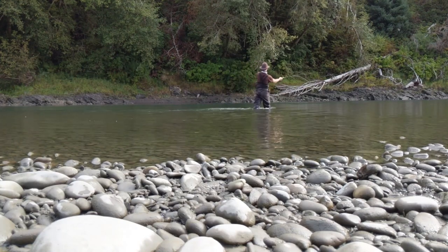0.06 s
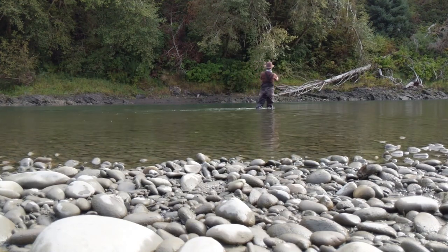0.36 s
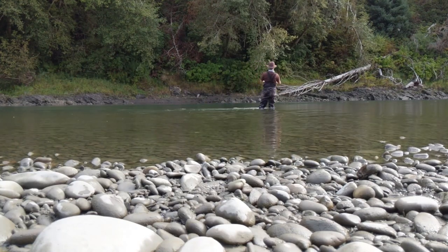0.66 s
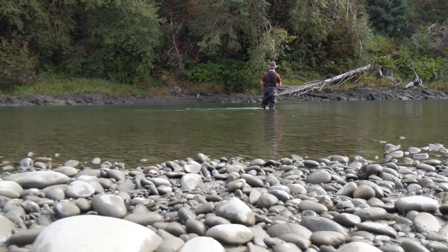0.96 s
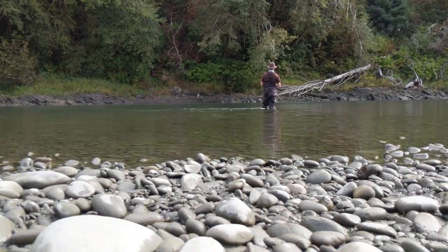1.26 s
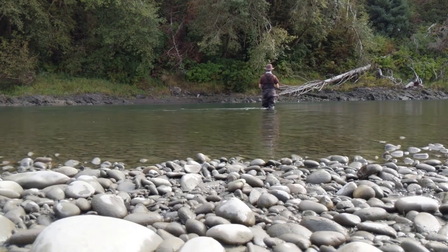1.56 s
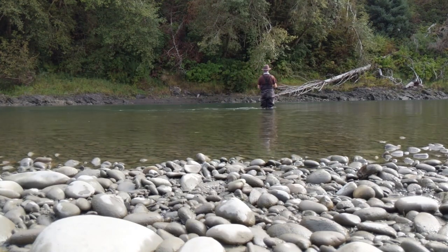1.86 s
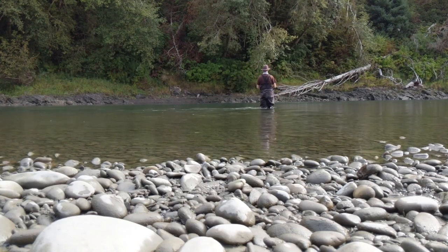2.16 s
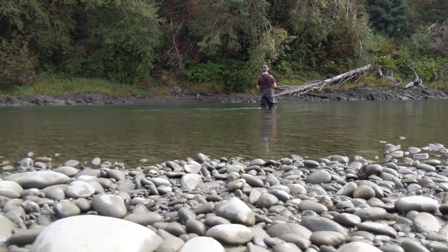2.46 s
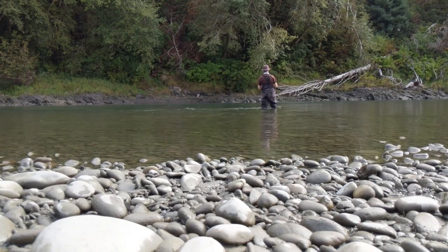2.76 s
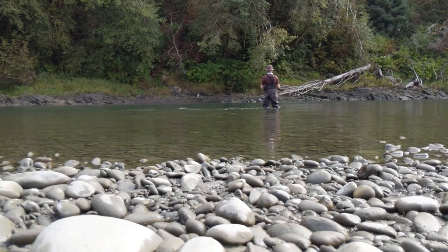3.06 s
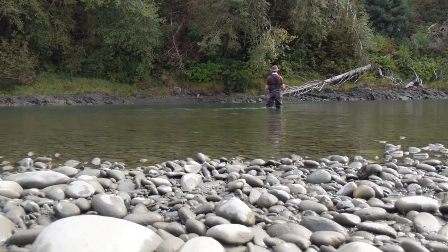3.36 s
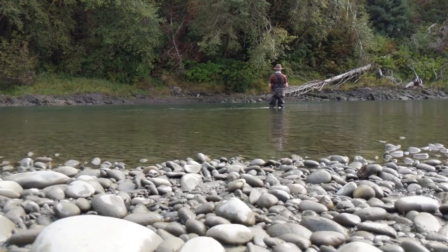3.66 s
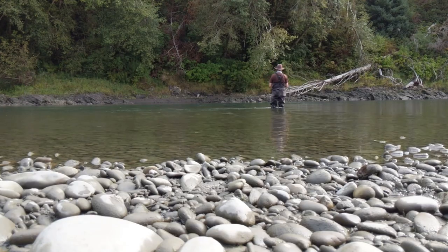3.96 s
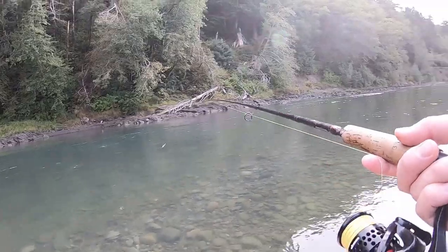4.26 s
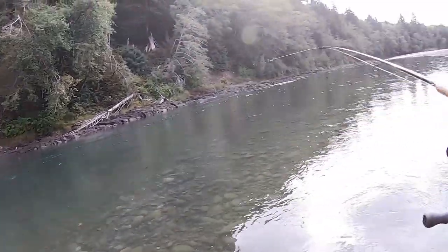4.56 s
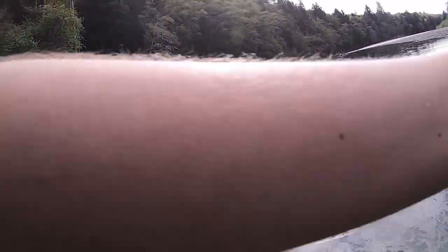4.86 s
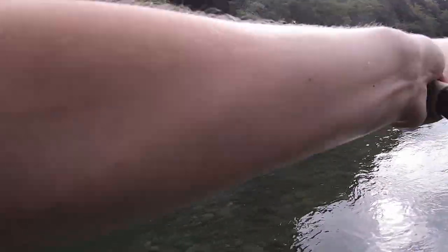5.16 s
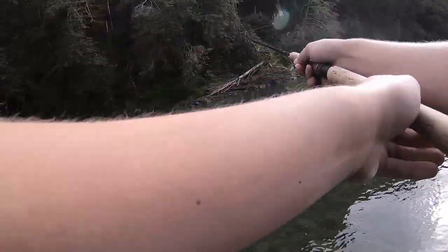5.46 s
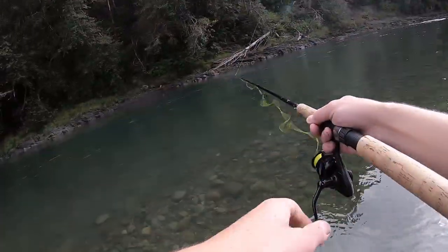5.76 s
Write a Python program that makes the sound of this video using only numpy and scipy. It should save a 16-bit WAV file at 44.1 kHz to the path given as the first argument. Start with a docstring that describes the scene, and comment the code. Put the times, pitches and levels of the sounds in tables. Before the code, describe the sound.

A fishing rod whips through the air with a low thump of wind on the close microphone, and line hisses off the spool. Legs wade through a shallow river, sloshing, gulping and dripping over the soft current. Midway the reel snaps shut with a sharp click. More strides follow, then a second puff of air and another whipping cast with line ticking out. A small bird chirps faintly far off.

```python
"""A shallow river, where an angler wades: water sloshes, gulps and spatters around the legs over the
murmur of the current. Ringing air bubbles and noise make these water sounds.
Two casts: the arm pushes air at the microphone, the rod swishes and whips as it sheds swirls of air,
and the line hisses off the spool ever slower. Between them the reel's bail (its wire arm) snaps shut,
the gear bumps softly and a small bird calls far off."""
import sys
import numpy as np
from scipy import signal
from scipy.fft import rfft, irfft, next_fast_len
from scipy.io import wavfile
from scipy.ndimage import map_coordinates

SR = 44100
rng = np.random.default_rng(int(sys.argv[2]) if len(sys.argv) > 2 else 0)


def transcribe(u):
    """Save the signal u as a 16-bit wav file named by the first command-line argument.

    u: samples, shape (n,) or (channels, n), limited to [-1, 1]; the rate is SR.
    q: integer samples, one column per channel.
    """
    v = np.clip(np.atleast_2d(u).T, -1, 1)
    q = np.round(v * 32767).astype(np.int16)
    wavfile.write(sys.argv[1], SR, q)


N = 260631
T = np.arange(N) / SR  # seconds, for the whole scene
SHORT = T[:SR // 4]  # seconds, for one short sound
DRIP_DB = -73  # spray of the current against standing legs

# tone of churned water: pitch_hz, level_db
SLOSH_TONE = [(150, -7), (270, -3.5), (400, 2), (700, 7), (1300, 8.5), (2000, -3), (3200, -62), (8000, -48)]
# tone of fine spray: pitch_hz, level_db
SPRAY_TONE = [(1000, 7.5), (2200, 8), (4200, 0), (6000, -17), (10000, -17), (16000, -51)]


def amp(db):
    """Turn decibels into a gain."""
    return 10 ** (np.asarray(db) / 20)


def unit(x):
    """Scale a sound to an average (rms) level of 1."""
    return x / np.sqrt(np.mean(x ** 2) + 1e-20)


def along(points, hz):
    """Read between (pitch_hz, value) points on a log pitch scale."""
    pitches, values = np.transpose(points)
    return np.interp(np.log(hz + 1), np.log(pitches + 1), values)


def wobble(per_s):
    """A smooth curve through per_s random values a second."""
    return map_coordinates(rng.standard_normal(int(N * per_s / SR) + 4), [T * per_s])


def filtered(x, response):
    """Scale each frequency of x by response(hz)."""
    size = next_fast_len(len(x) + SR // 2)
    return irfft(rfft(x, size) * response(np.fft.rfftfreq(size, 1 / SR)), size)[:len(x)]


def coloured(x, tone):
    """Shape x with a tone of (pitch_hz, level_db) points, then scale it to level 1."""
    return unit(filtered(x, lambda hz: amp(along(tone, hz))))


def noise(tone):
    """Noise with the given tone, at level 1."""
    return coloured(rng.standard_normal(N), tone)


def bell(peak_s, width_s):
    """A smooth hump that falls to 0.6 at width_s either side of its peak."""
    return np.exp(-.5 * ((T - peak_s) / width_s) ** 2)


def swell(peak_s, rise_s, fall_s):
    """A level that builds to a sharp peak and dies away."""
    return np.exp(-np.maximum(peak_s - T, 0) / rise_s - np.maximum(T - peak_s, 0) / fall_s)


def taps(per_s, scatter_db, fade_s):
    """The level of many random little hits, each fading fast."""
    hits = (rng.random(N) < per_s / SR) * amp(scatter_db * rng.standard_normal(N))
    return unit(signal.lfilter([1], [1, -np.exp(-1 / (fade_s * SR))], hits))


def add(track, start_s, sound):
    """Mix a sound into a track."""
    part = track[max(round(start_s * SR), 0):][:len(sound)]
    part += sound[:len(part)]


def airy_tone(pitch_hz, spread):
    """Noise around a pitch, as from air swirling off a thin moving thing; more spread is breathier."""
    cycles = np.cumsum(pitch_hz) / SR
    knots = rng.standard_normal((2, N))
    a, b = (map_coordinates(k, [cycles * spread], order=1, mode="wrap") for k in knots)
    return a * np.sin(2 * np.pi * cycles) + b * np.cos(2 * np.pi * cycles)


def bubbles(activity, centre_hz, octaves, cycles, rise, scatter_db, count):
    """Bubbles ring as fading, rising notes; high activity packs them closer at the same overall level."""
    when, pitch, life, size = rng.random((count, 4)).T
    start = np.searchsorted(np.cumsum(activity) / np.sum(activity), when)
    hz = centre_hz * 2 ** (octaves * (2 * pitch - 1))
    t = T[:round(1.5 * cycles / centre_hz * 2 ** octaves * SR)]
    age = t * (hz / (cycles * (.5 + life)))[:, None]
    ring = np.sin(2 * np.pi * hz[:, None] * t * (1 + rise * np.minimum(age, 2) / 2))
    ring *= np.exp(-np.pi * age) * (1 - np.exp(-20 * age))
    ring *= amp(-scatter_db * np.log(1 - .97 * size))[:, None]  # a few are much louder
    samples = start[:, None] + np.arange(len(t))
    return np.bincount(samples.ravel(), ring.ravel(), N)[:N] / np.sqrt(activity)


def river():
    """The current murmurs with small bubbles."""
    # tone of the current: pitch_hz, level_db
    current_tone = [(60, 2.5), (150, -1.5), (280, -6), (450, 0), (800, 0), (1300, -13.5), (2200, -11.5),
                    (3200, -17), (5000, -21.5), (8000, -26), (12000, -30.5), (16000, -31.5)]
    babble = bubbles(np.ones(N), centre_hz=817, octaves=1.24, cycles=7, rise=.1, scatter_db=2, count=900)
    return amp(-60 + .77 * wobble(9.6)) * noise(current_tone) + amp(-67) * unit(babble)


def breeze():
    """Light air rumbles on the microphone."""
    # gusts and the wake of the swinging arm: peak_s, level_db, rise_s, fall_s
    gusts = [(.12, -25.5, .3, .16), (1.78, -46.5, 0.16, 0.84), (5.18, -26.5, 0.062, 0.12)]
    # tone of the rumble: pitch_hz, level_db
    rumble_tone = [(8, 3), (15, 10), (30, -13.5), (60, -22), (120, -31.5), (250, -35), (600, -100)]
    air = amp(-54) + sum(amp(db) * swell(s, rise, fall) for s, db, rise, fall in gusts)
    return air * amp(1.75 * wobble(4.056)) * noise(rumble_tone)


def stirring():
    """How strong the slosh and the spray are as each stride builds up and settles."""
    # a leg shoving through the water: peak_s, rise_s, fall_s, slosh_db, spray_db
    strides = [(.08, .2, .36, -44, -54), (1.29, .2, .27, -52.5, -65), (1.92, .25, .22, -56, -68.5),
               (2.84, .04, .04, -55, -69), (3.22, .17, .25, -49, -63.5), (3.58, .13, .3, -46.5, -60.5),
               (4.115, .04, .06, -51.5, -62.5)]
    slosh_power, spray_power = 1e-12, amp(DRIP_DB) ** 2
    for peak_s, rise_s, fall_s, slosh_db, spray_db in strides:
        shove = swell(peak_s, rise_s, fall_s)
        slosh_power += (amp(slosh_db) * shove) ** 2
        spray_power += (amp(spray_db) * shove) ** 2
    return np.sqrt(slosh_power), np.sqrt(spray_power)


def wading():
    """The legs churn up clouds of bubbles and rounder gurgles, and throw fine spray."""
    slosh, spray = stirring()
    cloud = bubbles(slosh, centre_hz=780, octaves=1.5, cycles=17, rise=.35, scatter_db=3, count=1300)
    fizz = bubbles(spray, centre_hz=4000, octaves=1.2, cycles=13, rise=.1, scatter_db=3, count=2000)
    gurgles = bubbles(slosh, centre_hz=760, octaves=1.1, cycles=36, rise=.35, scatter_db=1, count=110)
    body = amp(-1.5) * coloured(cloud, SLOSH_TONE) + amp(-11) * noise(SLOSH_TONE)
    body += amp(-7.5) * unit(gurgles)
    lapping = amp(-64.5) * noise(SLOSH_TONE)  # the current against standing legs
    churn = np.minimum(slosh / amp(-58.5), 1)  # only hard-churned water fizzes
    mist = churn * coloured(fizz, SPRAY_TONE) + amp(-1) * noise(SPRAY_TONE)
    return lapping + slosh * body + spray * mist


def splashes():
    """Spray comes down in clumps, as a patter of ticks and, where a leg throws it, tiny bubbles."""
    # tone of falling spray: pitch_hz, level_db
    patter_tone = [(1500, -10), (4000, 4.5), (7000, -3.5), (11000, -11), (16000, -21)]
    _, spray = stirring()
    clumps = amp(2 * wobble(14))
    thrown = np.maximum(spray - amp(DRIP_DB), 1e-7) * clumps
    patter = coloured(taps(350, scatter_db=3, fade_s=.0014) * rng.standard_normal(N), patter_tone)
    plinks = bubbles(thrown, centre_hz=2900, octaves=.9, cycles=26, rise=.2, scatter_db=2.5, count=200)
    return amp(-4.5) * spray * clumps * patter + amp(-3.5) * thrown * unit(plinks)


def gulps():
    """A big air pocket snaps shut, then rings and glides as its shape and depth change; water washes in."""
    # the largest air pockets: start_s, level_db, pitch_hz, glide_ratio (above 1 rises)
    pockets = [(.042, -33.5, 251, 1.33), (.317, -35, 738, 1.34), (.669, -41, 800, 0.86),
               (1.152, -40, 332, 1), (1.168, -43.5, 770, 1.3), (1.233, -37.5, 414, 0.41),
               (1.254, -44, 1314, 0.95), (1.334, -35.5, 210.6, 1.05), (1.339, -36.5, 967, 1.2),
               (1.37, -45.5, 685, 1.23), (1.56, -49, 750, 1.15), (1.597, -42, 275, 1.3),
               (1.693, -45, 493, 1.4), (1.921, -43, 952, 1.15), (2.481, -43.5, 745, 1.06),
               (2.553, -41, 710, 1.1), (2.811, -45, 670, 0.82), (3.036, -39, 502, 1.28),
               (3.076, -43, 885, 1.12), (3.118, -32.5, 383, 1.4), (3.199, -42, 392, 1.18),
               (3.222, -36, 375, .87), (3.268, -40.5, 645, 1.08), (3.313, -41.5, 598, 1.33),
               (3.378, -36.5, 1230, 0.91), (3.385, -34.5, 797, 1.3), (3.49, -35, 620, 1.47),
               (3.505, -34, 448, 1.03), (3.569, -35.5, 1214, 1.12), (3.684, -45, 595, 1.04),
               (3.615, -41.5, 595, 1.2), (3.778, -42, 600, 1.1), (3.787, -42, 361, 1.1),
               (4.071, -36, 472, 1.15), (4.073, -45, 1336, 1.08), (4.092, -39.5, 608, 1.13),
               (4.387, -45.5, 370, 0.95)]
    rings, wash, snaps = np.zeros((3, N))
    for start_s, db, pitch_hz, glide in pockets:
        ring_s = .03 * (500 / pitch_hz) ** .57  # higher pockets ring shorter
        age = SHORT / ring_s
        hz = pitch_hz * (1 + (glide - 1) * np.minimum(age, 1.3))
        level = (1 - np.exp(-age / .05)) * np.exp(-1.8 * age ** 2)
        add(rings, start_s, amp(db - 3) * level * np.sin(2 * np.pi * np.cumsum(hz) / SR))
        add(wash, start_s, amp(db - 17) * level)
        add(snaps, start_s, amp(db - 14.5) * np.exp(-SHORT / .0029))
    rings *= amp(2 * wobble(90))
    snap_tone = [(300, -2), (1400, -1), (3000, -8), (9000, -31)]
    return rings + wash * noise(SLOSH_TONE) + snaps * noise(snap_tone)


def sleeve():
    """A sleeve brushes past as the arm swings."""
    # each brush: peak_s, level_db, width_s
    rustles = [(0.057, -49.5, 0.015), (5.04, -62.5, 0.033), (5.117, -53.5, 0.014)]
    # tone of the cloth: pitch_hz, level_db
    cloth_tone = [(600, 4), (2200, -2.5), (5000, -5), (9000, -7.5), (16000, -20)]
    return sum(amp(db) * bell(s, width) for s, db, width in rustles) * noise(cloth_tone)


def pushes():
    """The air pushes, then sucks back, with a flutter of small swirls."""
    # air pushed by the arm, and soft bumps of the gear: middle_s, level_db, width_s, flutter_db
    puffs = [(0.08, -12, 0.011, -29), (0.711, -43, 0.0011, -53), (1.784, -37.5, 0.056, -52),
             (4.27, -39.5, 0.0027, -54), (5.132, -14.5, 0.012, -38.5), (5.625, -39, 0.0014, -48)]
    # tone of the swirls: pitch_hz, level_db
    flutter_tone = [(20, -25), (50, 7), (100, -1.5), (200, -15), (320, -18), (600, -31), (2000, -39),
                    (9000, -60)]
    pressure, flutter = np.zeros((2, N))
    for s, db, width, flutter_db in puffs:
        pressure += amp(db) * (s - T) / width * bell(s, width) * np.sqrt(np.e)
        flutter += amp(flutter_db) * bell(s, 2.2 * width)
    return pressure + flutter * noise(flutter_tone)


def rod(whip_s, whip_tone, whip_db, swish_db, rush_db, whistle_hz, whistle_db):
    """The rod speeds up: air rushes, the tip's swish rises in pitch and ends in a whistling whip."""
    # tone of the rushing air: pitch_hz, level_db
    rush_tone = [(120, -64), (230, 7.5), (500, -7.5), (1400, -9.5), (2500, -8.5), (5000, -12),
                 (7000, -17.5), (10000, -18.5), (16000, -32)]
    before, after = np.maximum(whip_s - T, 0), np.maximum(T - whip_s, 0)
    rush = amp(rush_db) * np.exp(-before / .081 - after / .026) * noise(rush_tone)
    # the thin tip sings high, the thicker shaft lower
    tip_hz = (280 + 3300 * np.exp(-before / .044)) * amp(.9 * wobble(110))
    sweep = airy_tone(tip_hz, spread=.45) + amp(-4.5) * airy_tone(.59 * tip_hz, spread=.56)
    swing = np.exp(-np.maximum(before - .03, 0) / .044 - np.maximum(T - whip_s + .018, 0) / .021)
    swish = amp(swish_db - 5) * swing * sweep
    burst = bell(whip_s, .0052) + .14 * bell(whip_s + .004, .0043)
    whip = amp(whip_db - 2) * burst * housing(noise(whip_tone), ring_db=-2)
    whistle = amp(whistle_db) * bell(whip_s + .004, .0037) * airy_tone(np.full(N, whistle_hz), spread=.07)
    # the slowing rod leaves a low whoosh behind
    wake_tone = [(200, -25), (380, 1), (950, -.5), (1600, -2), (3000, -24.5)]
    wake = amp(whip_db - 15.5) * bell(whip_s + .0092, .015) * noise(wake_tone)
    return rush + swish + whip + whistle + wake


def housing(x, ring_db):
    """Sound close to the camera rings its case; the result is scaled to level 1."""
    # notes the case rings at: pitch_hz, width_hz, level_db
    notes = [(1324, 43, 7.5), (1762, 98, 9.5), (2260, 87, -8), (3020, 7.7, -6), (3330, 30, -16),
             (3650, 76, -7), (4290, 190, -2), (4540, 60, -24), (8250, 230, -4), (10100, 340, 1.5)]

    def ringing(hz):
        return sum(amp(db) * 1j * hz * width / (pitch ** 2 - hz ** 2 + 1j * hz * width)
                   for pitch, width, db in notes)
    return unit(filtered(x, lambda hz: 1 + amp(ring_db) * ringing(hz)))


def line(whip_s, hiss_db, rattle_db, hum_db):
    """The line flies off the spool, slowed by the air."""
    # tone of the line's hiss: pitch_hz, level_db
    hiss_tone = [(3000, -25), (6000, -7), (8300, -2), (11000, -6), (16000, -7)]
    # tone of the line's rattle: pitch_hz, level_db
    rattle_tone = [(200, 10.5), (700, 11.5), (1500, 5), (2000, 1.5), (3000, 1.5), (4900, -6), (6300, -24),
                   (9000, -8.5), (16000, -11)]
    after = np.maximum(T - whip_s, 0)
    flying = .5 + .5 * np.tanh((T - whip_s) / .056)
    speed = 1 / (1 + after / .26)
    # the fluttering hiss falls in pitch with the speed
    hiss_hz = np.minimum(25500 * speed, 15000) * amp(.35 * wobble(120))
    hiss = airy_tone(hiss_hz, spread=.56) + amp(-3.5) * noise(hiss_tone)
    hiss *= amp(hiss_db + 1.3 * wobble(71)) * flying * np.exp(-after / .44)
    # coils slap the guides, the rings along the rod
    slaps = taps(300 * speed, scatter_db=4, fade_s=.001)
    rattle = housing(coloured((3.1 + slaps) * rng.standard_normal(N), rattle_tone), ring_db=1.5)
    rattle *= amp(rattle_db - 3.5) * flying * np.exp(-after / .2)
    # the whirling loop of line hums, sinking as it slows
    hum = airy_tone(160 + 135 * np.exp(-after / .25) + 130 * np.exp(-after / .02), spread=.15)
    hum *= amp(hum_db) * (1 - np.exp(-after / .01)) * np.exp(-after / .16)
    return hiss + rattle + hum


def guides(whip_times):
    """Loose line ticks on the rod's guides, and the slow last coils whisper through them."""
    # the hardest slaps of the line: start_s, level_db
    slaps = [(0.553, -38.5), (.789, -42), (5.341, -39), (5.431, -41)]
    running = sum(swell(s, rise_s=.022, fall_s=.47) for s in whip_times)
    ticks = amp(-55) * running * taps(30, scatter_db=2, fade_s=.002)
    for start_s, db in slaps:
        add(ticks, start_s, amp(db - 1) * np.exp(-SHORT / .0042) * (1 - np.exp(-SHORT / .00045)))
    whisper = amp(-62) * sum(swell(s, rise_s=.023, fall_s=.77) for s in whip_times)
    tick_tone = [(600, -23), (1800, 10), (3000, 3), (5000, -5.5), (8000, -18.5)]
    whisper_tone = [(1000, -5), (2500, 6), (4500, -2), (7500, -12), (12000, -30)]
    return ticks * noise(tick_tone) + whisper * noise(whisper_tone)


def spool(whip_times):
    """The line scrapes the spool's lip, high and then lower."""
    # scrapes after each whip: delay_s, level_db, width_s, pitch_hz
    scrapes = [(0.138, -62, 0.076, 4970), (.46, -67, 0.15, 2896)]
    out = np.zeros(N)
    for delay_s, db, width_s, hz in scrapes:
        touching = sum(bell(s + delay_s, width_s) for s in whip_times)
        out += amp(db) * touching * airy_tone(np.full(N, hz), spread=.33)
    return out * amp(4.9 * wobble(110))


def casting():
    """Each swing of the rod sends the line off the spool and through the guides."""
    # the casts: whip_s, whip_db, swish_db, rush_db, whistle_hz, whistle_db, hiss_db, rattle_db, hum_db
    casts = [(.221, -28, -36.5, -42.5, 1811, -34.5, -55, -42.5, -46.5),
             (5.278, -23.5, -35.5, -46, 3020, -38, -53, -43.5, -52.5)]
    # tone of the whip, one list for each cast: pitch_hz, level_db
    whip_tones = [
        [(180, -37), (300, -18), (1110, -3.5), (1800, -4), (2420, -11.5), (4260, -8.5), (6890, -29),
         (8140, -13), (10100, -18.5), (11300, -26), (15800, -29)],
        [(180, -38), (300, -17), (643, -24), (1010, -5), (1710, -4.5), (2120, -12), (3010, 2), (3670, -5),
         (4330, -0.5), (5030, -10), (6670, -19.5), (10300, -27.5), (15800, -29)],
    ]
    whip_times = [s for s, *_ in casts]
    out = guides(whip_times) + spool(whip_times)
    for (whip_s, *rod_settings, hiss_db, rattle_db, hum_db), tone in zip(casts, whip_tones):
        out += rod(whip_s, tone, *rod_settings) + line(whip_s, hiss_db, rattle_db, hum_db)
    return out


def bird():
    """A far bird's thin, high notes sag in pitch and linger among the trees."""
    # the notes: start_s, level_db, length_s, pitch_hz
    chirps = [(0.949, -64, 0.084, 7500), (1.134, -71, 0.1, 7470), (1.521, -73, .05, 7800),
              (2.726, -71, 0.049, 7520), (2.922, -67, 0.041, 7200), (4.203, -61, 0.042, 7460),
              (4.293, -64.5, 0.045, 7200)]
    out = np.zeros(N)
    for start_s, db, length_s, hz in chirps:
        pitch = hz * (1 - .21 * np.clip(T - start_s, 0, .5))
        note = bell(start_s + length_s / 2, .62 * length_s) * airy_tone(pitch, spread=.12)
        linger = bell(start_s + length_s, 2 * length_s) * airy_tone(.88 * pitch, spread=.35)
        out += amp(db - 4) * note + amp(db - 11) * linger
    return out * amp(3.4 * wobble(45))


def drops():
    """A drop ticks on the surface and leaves a tiny ringing bubble."""
    # the heaviest drops falling back: start_s, level_db, pitch_hz
    heavy_drops = [(1.5617, -42, 1980), (2.1214, -44, 2320), (2.45, -46.5, 2370), (2.861, -48, 3750),
                   (3.0376, -38.5, 1830), (3.1214, -43, 1730), (3.3153, -42, 4370), (3.547, -38, 1710),
                   (3.6153, -40.5, 2720), (3.8926, -40.5, 1910), (4.144, -40.5, 1750)]
    plinks, ticks = np.zeros((2, N))
    level = np.exp(-SHORT / .0035) * (1 - np.exp(-SHORT / .0004))
    for start_s, db, hz in heavy_drops:
        add(plinks, start_s, amp(db - 1) * level * np.sin(2 * np.pi * hz * SHORT * (1 + 3 * SHORT)))
        add(ticks, start_s, amp(db - 11) * np.exp(-SHORT / .005))
    return plinks + ticks * noise(SPRAY_TONE)


def reel():
    """The bail snaps shut and bounces to rest; each hit and each light click rings the reel and rod."""
    # light clicks in the reel: start_s, level_db
    clicks = [(2.233, -44.5), (2.2835, -44.5), (2.3124, -49), (4.2415, -46.5), (4.255, -48.5), (4.55, -51)]
    # notes the reel rings at on its rod: pitch_hz, level_db, ring_s (time to fade by 60 dB)
    notes = [(473, -17, 0.17), (598, 1, 0.036), (690, -5, 0.14), (782, -5, 0.12), (1240, -3, 0.025),
             (1750, -13, 0.03), (2760, -5.5, 0.0079), (5130, -10, 0.012), (6750, -21, .02)]
    # tone of a hit's crack: pitch_hz, level_db
    crack_tone = [(200, -40), (700, -2), (3000, 14), (5200, 12), (7500, -2), (12000, -10), (16000, -15)]
    snap_s, first_gap_s, gap_growth, ring_lag_s = 2.255, .0045, 1.05, .0015
    bounce = np.arange(5)
    times = snap_s + first_gap_s * (np.cumsum(gap_growth ** bounce) - 1) / gap_growth
    hits = list(zip(times, -25 - 8 * bounce, -29 - 10 * bounce))
    hits += [(s, db, db - 9) for s, db in clicks]
    crack_shape = np.exp(-SHORT / .0016) + .035 * np.exp(-SHORT / .01)  # loose parts buzz on
    ring, crack = np.zeros((2, N))
    for start_s, crack_db, ring_db in hits:
        strengths = amp(1.5 * rng.standard_normal(len(notes)))
        ringing = sum(gain * amp(db - 60 * SHORT / ring_s) * np.sin(2 * np.pi * hz * SHORT)
                      for gain, (hz, db, ring_s) in zip(strengths, notes))
        add(ring, start_s + ring_lag_s, amp(ring_db) * ringing)
        add(crack, start_s, amp(crack_db) * crack_shape)
    return ring + crack * noise(crack_tone)


def banks(x):
    """Stones and trees on the banks scatter an echo back."""
    # how long the echo lasts: pitch_hz, fade_s (time to fade by 60 dB)
    fade_times = [(200, 0.6), (1500, 0.36), (10000, 0.026)]
    hz, t, spectrum = signal.stft(rng.standard_normal(SR // 2), SR, nperseg=256)
    fading = amp(-60 * t / along(fade_times, hz)[:, None])
    _, tail = signal.istft(spectrum * fading, SR, nperseg=256)
    return signal.fftconvolve(x, tail / np.linalg.norm(tail))[:N]


def scene():
    """Water, fishing gear and moving air close by, river and bird beyond, in one channel."""
    near = wading() + splashes() + gulps() + drops() + reel() + sleeve() + casting()
    return (near + amp(-20) * banks(near) + pushes() + river() + breeze() + bird())[None]


def record(dry):
    """The camera keeps nothing above its highest pitch."""
    top_hz = 15850
    return np.array([filtered(x, lambda hz: hz < top_hz) for x in dry])


dry = scene()
out = record(dry)
transcribe(out)
```